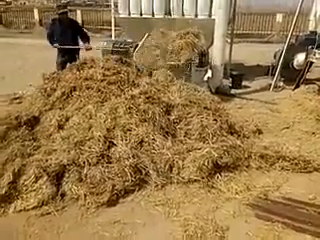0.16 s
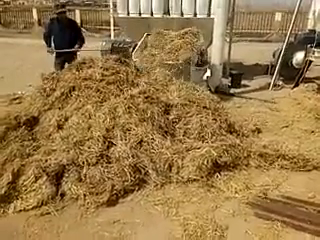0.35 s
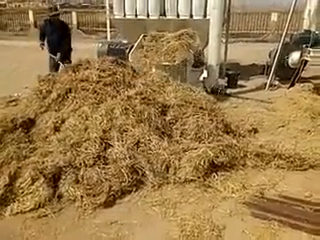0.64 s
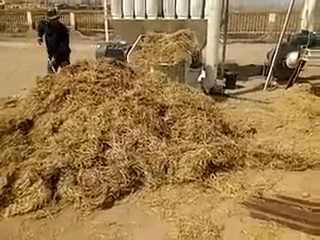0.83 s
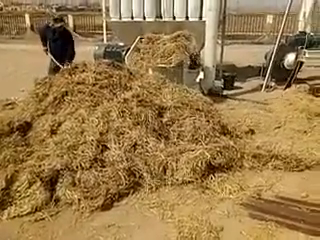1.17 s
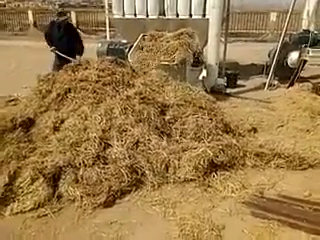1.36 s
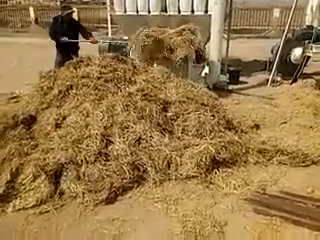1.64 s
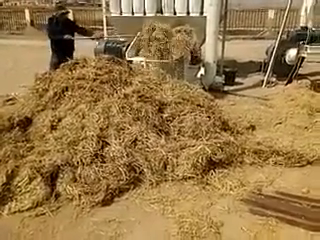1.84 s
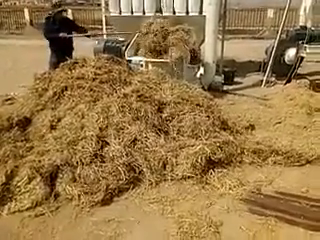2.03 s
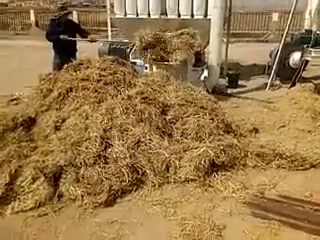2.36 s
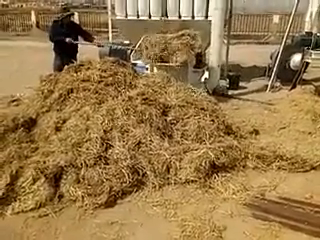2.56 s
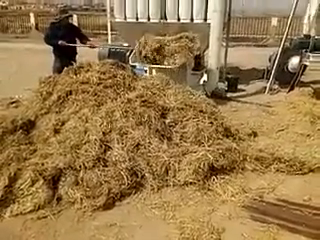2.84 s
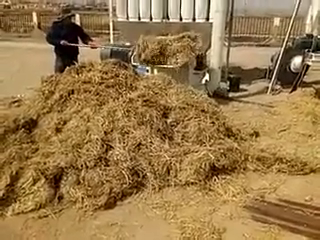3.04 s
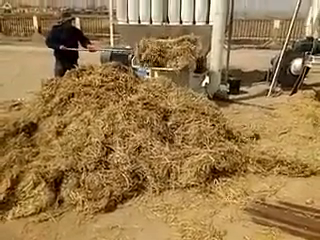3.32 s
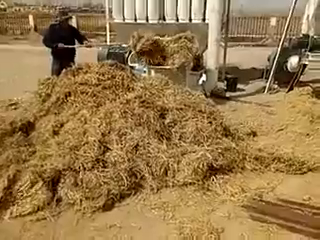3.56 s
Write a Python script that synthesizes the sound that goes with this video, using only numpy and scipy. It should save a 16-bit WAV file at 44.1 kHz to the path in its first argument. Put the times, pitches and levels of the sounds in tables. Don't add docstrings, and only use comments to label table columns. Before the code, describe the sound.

Loud hammer mill drones and howls as chopped straw sprays and rattles on sheet metal.

```python
import sys
import numpy as np
from scipy import signal
from scipy.fft import rfft, irfft, next_fast_len
from scipy.io import wavfile
from scipy.ndimage import uniform_filter1d, map_coordinates

SR = 44100
rng = np.random.default_rng(int(sys.argv[2]) if len(sys.argv) > 2 else 0)


def ratio(d):
    e = np.asarray(d, float) / 20
    return 10 ** e


def inscribe(sig):
    pcm = np.round(np.clip(np.atleast_2d(sig).T, -1, 1) * 32767)
    wavfile.write(sys.argv[1], SR, pcm.astype(np.int16))


N = 162729

WHINE_ORDERS = [3, 6, 24, 34.75, 41.95, 47]
# [level/dB rms, beating depth/dB]
WHINE_LEVELS = [(-45.5, 1), (-38.5, 2.5), (-50, 3), (-52.5, 3.5), (-47, 2.5), (-46.5, 1.5)]
# [t/s, level/dB]
SECOND_PASS = [(0.0, -40), (0.03, -44), (1.05, -40), (1.32, -44), (1.48, -37), (1.63, -42.5), (1.82, -38.5),
               (1.87, -61), (1.98, -36.5), (2.3, -41), (2.33, -52.5), (3.69, -49.5)]
# [t/s, length/s, level/dB rms]
CUT_SWELLS = [(0.116, 0.096, -34), (0.296, 0.054, -39), (0.424, .06, -34), (0.718, 0.097, -29.5),
              (0.897, 0.067, -33.5), (1.257, 0.14, -34), (1.502, 0.087, -28.5), (1.85, 0.095, -33.5),
              (2.021, 0.089, -32), (2.372, 0.086, -43), (2.719, 0.095, -39), (2.907, 0.068, -36),
              (3.07, 0.11, -42), (3.391, .17, -29)]


def rotor():
    shaft_hz, drift = 49.95, 0.0012
    flutter_rad, smear = 0.41, 0.37
    turn = 2 * np.pi * np.cumsum(shaft_hz * (1 + drift * wobble(6.06))) / SR

    def tone(order, db):
        level = ratio(db + 3.5 * wobble(25.0))
        return level * np.sin(order * turn + order + flutter_rad * wobble(30))

    whine = sum(tone(order, db + deep_db * wobble(6.85))
                for order, (db, deep_db) in zip(WHINE_ORDERS, WHINE_LEVELS))
    cut_level = ratio(-41) + sum(swell(*row) for row in CUT_SWELLS)
    cut_tone = 0.56 * np.sin(18 * turn + flutter_rad * wobble(30))
    cuts = cut_level * (cut_tone + smear * narrow(18 * shaft_hz, 74))
    gust_db = uniform_filter1d(curve(WIND_GUSTS), size=SR // 2)
    shudder = tone(0.98, -46 + gust_db - gust_db.mean())
    pass_db = curve(SECOND_PASS)
    passing = tone(12, pass_db - 1.5) + smear * ratio(pass_db) * narrow(12 * shaft_hz, 40)
    return np.sqrt(2) * (whine + cuts + shudder + passing)


# [f/Hz, width/Hz, level/dB]
DRUM_MODES = [(220.5, 21, 3.5), (243, 22, 5), (268, 16, -2), (291, 25, 2)]
# [t/s, length/s, level/dB rms]
AIR_SURGES = [(0.149, 0.24, -29), (0.725, 0.13, -21.5), (1.023, 0.23, -22.5), (1.42, 0.27, -22),
              (1.801, 0.2, -27), (2.132, 0.28, -27), (2.449, 0.21, -27), (2.793, 0.15, -21.5),
              (2.93, 0.053, -25), (3.206, 0.26, -21), (3.602, 0.25, -19)]
# [t/s, f/Hz, level/dB rms]
HOWL_THROBS = [(0.046, 272, -26), (0.13, 268, -27), (0.164, 250.6, -23), (0.233, 253, -23.5),
               (0.301, 292, -26), (0.32, 293.4, -24), (0.637, 253.6, -23.5), (0.664, 275, -20.5),
               (0.714, 243.4, -23), (0.759, 258.7, -21), (0.799, 268, -17), (0.933, 259, -23.5),
               (0.967, 242.3, -18.5), (0.993, 245.5, -16.5), (1.034, 240.4, -16.8), (1.089, 258, -19.5),
               (1.12, 265.2, -18.5), (1.234, 251.2, -23.5), (1.317, 257, -25), (1.363, 238.8, -22.5),
               (1.38, 236, -23), (1.396, 253, -17.5), (1.416, 253, -18.5), (1.454, 242.4, -24),
               (1.48, 245.3, -22.5), (1.646, 235.7, -20.5), (1.748, 249.8, -22), (1.771, 236.3, -24),
               (1.79, 259.9, -19.5), (1.836, 245.6, -18), (1.863, 232.9, -22), (1.954, 252, -20.5),
               (2.13, 292.9, -24), (2.38, 243, -24), (2.5, 283.5, -29), (2.516, 269.2, -24),
               (2.592, 261.1, -25.5), (2.765, 242.5, -19), (2.797, 247.7, -24), (2.815, 259, -20),
               (2.834, 250.4, -28), (2.866, 238.6, -24), (2.93, 266, -20), (3.051, 273.5, -22),
               (3.08, 248.7, -31), (3.112, 269, -26), (3.135, 255.6, -22.5), (3.168, 269.8, -20),
               (3.193, 274.6, -17.5), (3.213, 255, -19.5), (3.237, 259, -31), (3.266, 237, -21),
               (3.411, 287, -24.5), (3.535, 251, -22), (3.563, 249.7, -27), (3.594, 262.3, -18.5),
               (3.623, 250, -19), (3.662, 243, -27)]
# [f/Hz, level/dB per Hz]
AIR_COLOUR = [(71, -44), (120, -14.5), (270, -4.5), (530, -16), (700, -15), (893, -11), (1120, -14.5),
              (1590, -17.5), (1700, -35), (2210, -52), (3740, -120)]


def drum():
    rest_db, howl_db, boom_db = -28, -11.5, -4.5
    surge = np.sqrt(ratio(2 * rest_db) + sum(swell(*row) ** 2 for row in AIR_SURGES))

    def resonance(f):
        modes = sum(ratio(db) * peak(f, hz, width_hz) for hz, width_hz, db in DRUM_MODES)
        return modes * peak(f, 246, 120)

    boom = even(unit(filtered(rng.standard_normal(N), resonance)), 0.019)
    throb_power = sum(swell(s, 0.027, db) ** 2 for s, hz, db in HOWL_THROBS)
    howl_level = np.sqrt((ratio(howl_db) * surge) ** 2 + throb_power)
    howl_hz = curve(HOWL_THROBS) + 9 * wobble(40)
    howl = np.sqrt(2) * np.sin(2 * np.pi * np.cumsum(howl_hz) / SR)
    air = ratio(-30) * unit(surge) ** 0.055 * rush(AIR_COLOUR, patchy_db=2.0)
    return ratio(boom_db) * surge * boom + howl_level * howl + air


# [t/s, level/dB]
STRAW_FEED = [(0.0, -27.5), (0.52, -28.5), (0.53, -26.5), (1.87, -29), (1.96, -27), (1.98, -32),
              (2.1, -26.5), (2.14, -29), (2.5, -28.5), (2.56, -30), (2.93, -26.5), (3.69, -29)]
# [f/Hz, level/dB per Hz]
SPRAY_COLOUR = [(880, -30), (1500, -25), (1630, -13), (2030, -2), (2300, -10), (2660, -1.5), (3160, -8.5),
                (3850, -11.5), (4700, -15), (6110, -53), (10300, -120)]
# [f/Hz, level/dB per Hz]
SCREEN_COLOUR = [(2590, -37), (4400, -13), (4760, -7), (5080, -4.5), (5880, -3), (7070, -21), (7380, -25),
                 (9590, -57), (16200, -120)]
CASING_HZ = [1738, 2580, 2740, 4990, 5025, 5110, 5205, 5465, 5728, 6050, 6335, 6410]
# [width/Hz, level/dB rms]
CASING_RINGING = [(25, -45.5), (51, -41), (70.4, -42.5), (25, -45), (25, -52.5), (37, -45.5), (25, -40.5),
                  (38, -44), (30, -42.5), (50, -44), (35, -53), (35, -55)]
# [t/s, f/Hz, length/s, level/dB rms]
PANEL_CLUMPS = [(.11, 5090, 0.14, -29.5), (0.304, 2560, 0.071, -33), (0.307, 5700, 0.16, -28),
                (0.358, 5445, 0.063, -27), (.41, 2760, .06, -33.5), (.5, 5180, .1, -32),
                (0.563, 2700, 0.065, -36), (0.587, 2860, .06, -29.5), (0.668, 5460, 0.083, -32),
                (.74, 2790, 0.045, -32), (0.822, 2694, 0.045, -25), (0.87, 5450, .05, -32),
                (.9, 2754, 0.1, -28.5), (.99, 2535, 0.11, -33), (1.04, 5200, 0.13, -29),
                (1.11, 5750, 0.14, -40), (1.18, 2570, 0.046, -25.5), (1.242, 5000, .07, -33),
                (1.369, 2818, 0.059, -34), (1.425, 5693, 0.09, -32.5), (1.444, 2580, .1, -33),
                (1.581, 2740, 0.057, -35), (1.582, 5715, .15, -29.5), (1.721, 5080, 0.099, -39),
                (1.77, 5705, 0.21, -29.5), (1.824, 2720, 0.023, -29.5), (1.956, 2107, 0.12, -31),
                (2.079, 2589, .11, -27.5), (2.221, 2710, 0.034, -33), (2.268, 2626, 0.12, -29),
                (2.35, 5745, .09, -32), (2.373, 5130, 0.041, -30), (2.48, 2666, .1, -30.5),
                (2.708, 5163, 0.088, -38), (2.71, 5515, 0.11, -30), (2.871, 5714, .2, -33.5),
                (2.93, 5027, 0.15, -27.5), (3.011, 2580, 0.097, -28), (3.048, 5810, 0.082, -28),
                (3.309, 2740, 0.11, -35), (3.479, 5010, 0.071, -26.5), (3.607, 2630, 0.068, -30)]


def straw():
    spray = ratio(curve(STRAW_FEED) - 0.5) * rush(SPRAY_COLOUR, patchy_db=1.94)
    screen = ratio(-32 + 0.16 * wobble(5.09)) * rush(SCREEN_COLOUR, patchy_db=3.5)
    ringing = sum(ratio(db + 1.9 * wobble(7.81)) * narrow(hz, width_hz)
                  for hz, (width_hz, db) in zip(CASING_HZ, CASING_RINGING))
    rattles = sum(swell(s, length, db) * narrow(hz, width_hz=80) for s, hz, length, db in PANEL_CLUMPS)
    return spray + screen + ringing + rattles


# [t/s, peak level/dB, f/Hz]
GRIT_HITS = [
    (2.0417, -13, 4600),
]


def grit():
    return ticks(GRIT_HITS)


# [t/s, level/dB]
WIND_GUSTS = [(0.0, -42), (0.17, -47), (0.27, -39), (0.33, -36), (0.61, -40.5), (0.71, -31), (0.76, -42),
              (0.97, -33.5), (1.2, -42.5), (1.28, -34), (1.31, -42), (1.48, -26.5), (1.51, -42),
              (2.86, -41), (3.21, -28), (3.29, -33), (3.46, -29.5), (3.69, -33)]
# [f/Hz, level/dB per Hz]
THUMP_COLOUR = [(12, -27), (40, -6), (50, -12), (86, 3), (110, -2.5), (150, -2), (200, -5), (260, -24),
                (440, -120)]
# [t/s, f/Hz, length/s, level/dB rms]
GUST_FRONTS = [
    (0.253, 121, 0.083, -23),
    (0.712, 101, 0.046, -26),
    (3.195, 110, 0.12, -30),
    (3.449, 92.93, 0.079, -25),
]


def wind():
    buffeting = ratio(curve(WIND_GUSTS) + 1.0) * even(rush(THUMP_COLOUR, patchy_db=3.0), 0.019)
    fronts = sum(swell(s, length, db) * narrow(hz, width_hz=90) for s, hz, length, db in GUST_FRONTS)
    return buffeting + fronts


# [t/s, level/dB]
HISS_SWELL_DB = [(0.0, -40), (0.01, -60), (0.05, -61.5), (2.72, -66.5), (2.95, -57), (2.96, -61.5),
                 (3.68, -64), (3.69, -38)]
# [f/Hz, level/dB per Hz]
HISS_COLOUR = [(7300, -62), (7700, 2), (8200, 3), (9200, -4.5), (11000, -5.5), (13950, -6.5), (14020, -64),
               (15000, -120)]


def microphone_hiss():
    return ratio(curve(HISS_SWELL_DB) + 5.0 + 0.31 * wobble(15)) * rush(HISS_COLOUR, patchy_db=1.0)


# [f/Hz, wide gaps, small gaps]
GAP_THRESHOLDS = [(7000, -4, -3), (7600, -.5, -.6), (8000, 1.5, -.1), (8300, .4, -.2), (8800, -.6, -.3),
                  (9600, -2.1, -.45), (14000, -3, -.45)]
GAP_MOMENTS = [.2, .33, .6, 1.57, 1.8, 2.3, 2.7, 3.19]


def gapped(x):
    f, t, z = signal.stft(x, SR, nperseg=2048, noverlap=1536)

    def field(bins, frames):
        across = uniform_filter1d(rng.standard_normal(z.shape), size=bins, axis=0)
        return unit(uniform_filter1d(across, size=frames, axis=1))

    hz, wide, small = np.transpose(GAP_THRESHOLDS)
    moments = sum(np.exp(-4 * ((t - s) / 0.14) ** 2) for s in GAP_MOMENTS)
    pull = 1.6 * (moments - 0.3) * (f > hz[0])[:, None]
    keep_wide = field(24, 4) > np.interp(f, hz, wide)[:, None] + pull
    keep_small = field(5, 5) > np.interp(f, hz, small)[:, None]
    return signal.istft(z * (keep_wide & keep_small), SR, nperseg=2048, noverlap=1536)[1][:N]


# [t/s, peak level/dB, f/Hz]
RECORDER_CLICKS = [
    (3.4103, -36, 11500),
]


def recorder_click():
    return ticks(RECORDER_CLICKS)


def unit(x):
    return x / np.sqrt(np.mean(x ** 2) + 1e-20)


def curve(rows, count=1):
    columns = np.transpose(rows)
    return np.interp(np.arange(N) / SR, columns[0], columns[count])


def wobble(rate):
    return map_coordinates(rng.standard_normal(400), [np.arange(N) * rate / SR])


def swell(s, length, db):
    return ratio(db) * np.exp(-4 * ((np.arange(N) / SR - s) / length) ** 2)


def filtered(x, response):
    m = next_fast_len(N + 8192)
    return irfft(rfft(x, m) * response(np.fft.rfftfreq(m, 1 / SR)), m)[:N]


def peak(f, hz, width_hz):
    return 1j * f * width_hz / (hz * hz - f * f + 1j * f * width_hz)


def rush(spectrum, patchy_db):
    z = signal.stft(rng.standard_normal(N), nperseg=1024)[2]
    across = uniform_filter1d(rng.standard_normal(z.shape), size=4, axis=0)
    field = uniform_filter1d(across, size=7, axis=1)
    x = signal.istft(z * ratio(patchy_db * unit(field)), nperseg=1024)[1][:N]
    f, db = np.transpose(spectrum)
    return unit(filtered(x, lambda hz: ratio(np.interp(np.log(hz + 1), np.log(f + 1), db))))


def narrow(hz, width_hz):
    mode = signal.iirpeak(hz, hz / width_hz, SR)
    once = signal.lfilter(*mode, rng.standard_normal(N))
    return even(unit(signal.lfilter(*mode, once)), 0.014)


def even(x, seconds):
    size = int(seconds * SR)
    envelope = uniform_filter1d(uniform_filter1d(np.abs(x), size=size), size=size)
    return unit(x / (envelope + 1e-3) ** 0.41)


def ticks(rows):
    out = np.zeros(N)
    for s, db, hz in rows:
        cycles = (np.arange(N) / SR - s) * hz
        out += ratio(db) * np.exp(-(cycles / 1.7) ** 2) * np.sin(2 * np.pi * cycles)
    return out


def scene():
    return (rotor() + drum() + straw() + grit() + wind())[None]


def low_pass(x):
    return signal.sosfilt(signal.butter(12, 15900, fs=SR, output="sos"), x)


def record(dry):
    edge_hz, edge_width_hz = 7920, 130
    sound = filtered(dry[0], lambda f: 1 / (1 + np.exp(np.clip((f - edge_hz) / edge_width_hz, -50, 50))))
    mix = gapped(sound + microphone_hiss()) + recorder_click()
    return low_pass(mix[None])


dry = scene()
out = record(dry)
inscribe(out)
```